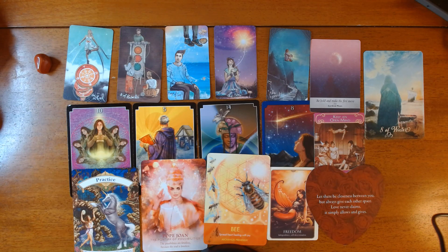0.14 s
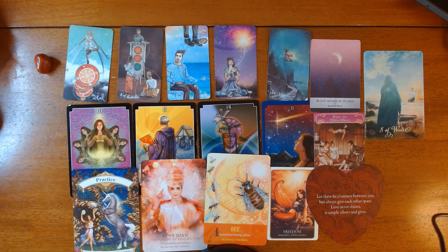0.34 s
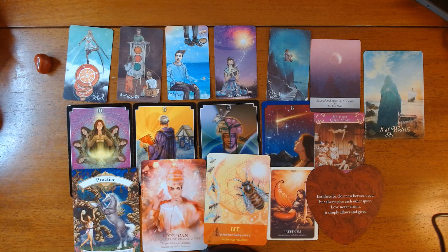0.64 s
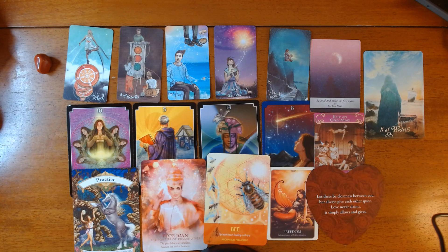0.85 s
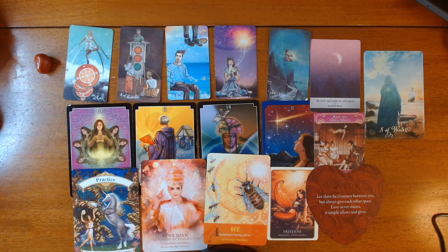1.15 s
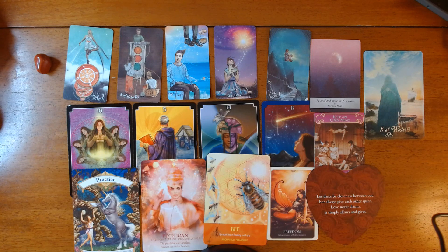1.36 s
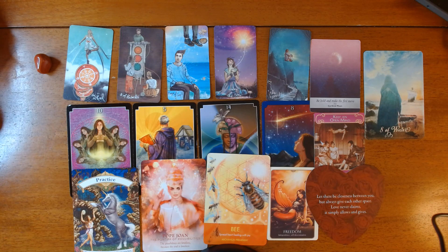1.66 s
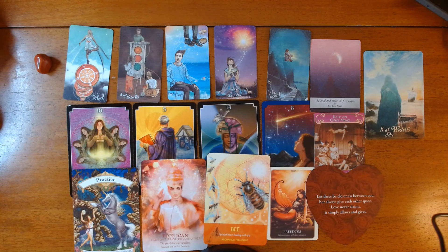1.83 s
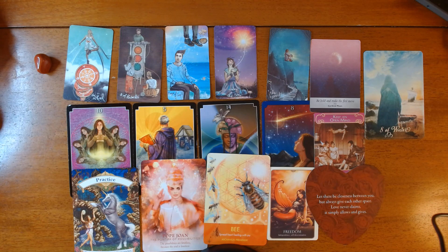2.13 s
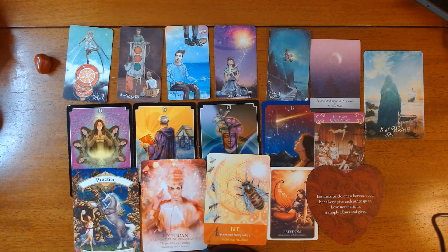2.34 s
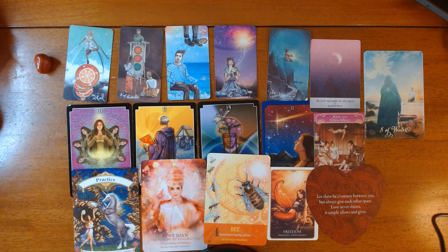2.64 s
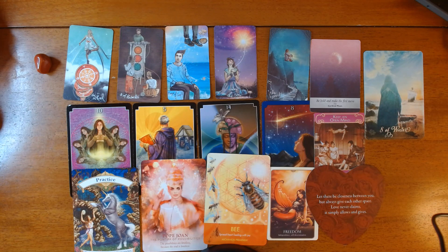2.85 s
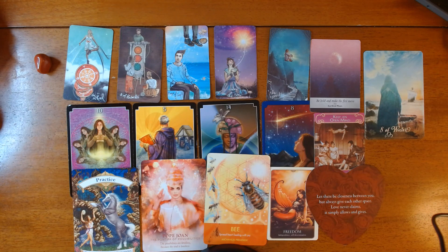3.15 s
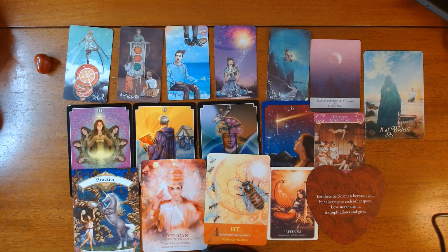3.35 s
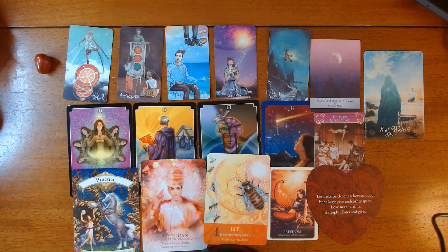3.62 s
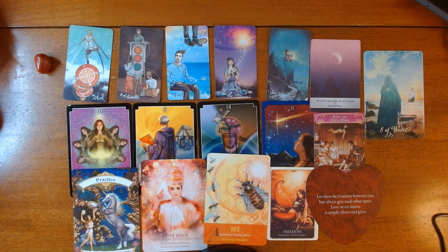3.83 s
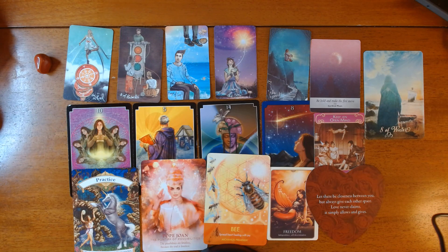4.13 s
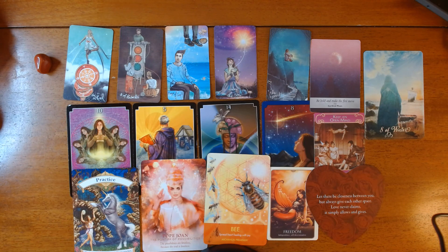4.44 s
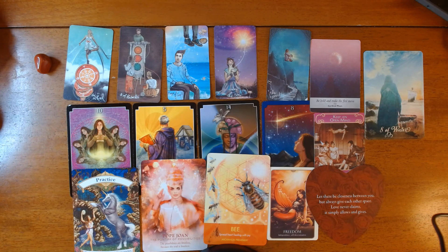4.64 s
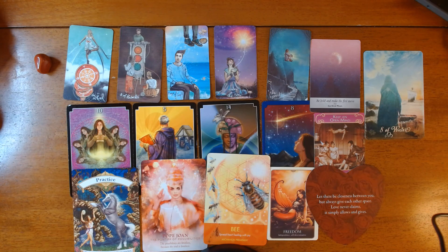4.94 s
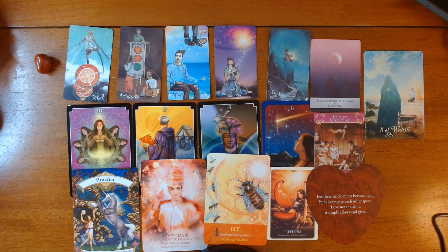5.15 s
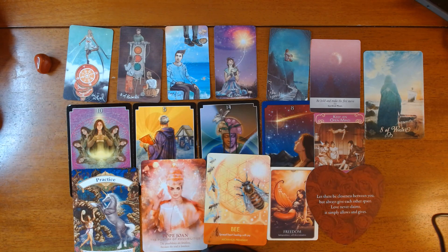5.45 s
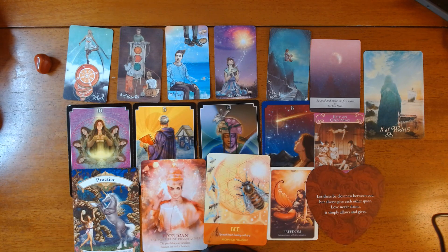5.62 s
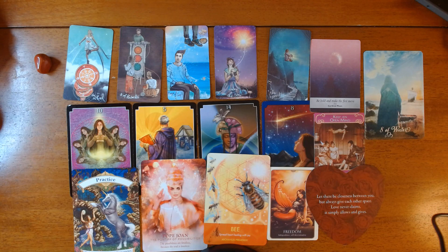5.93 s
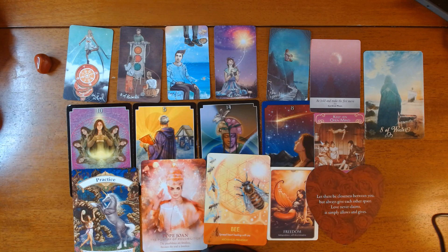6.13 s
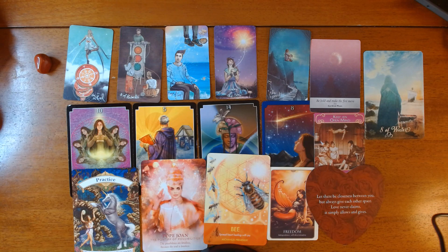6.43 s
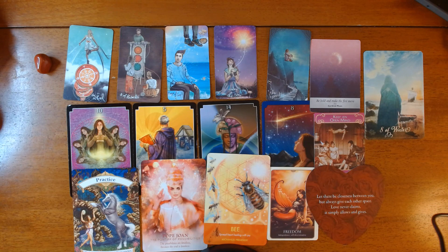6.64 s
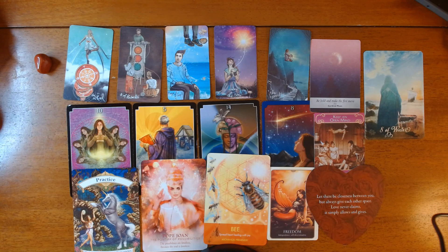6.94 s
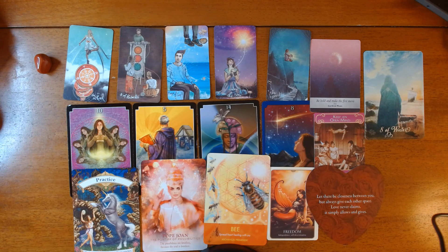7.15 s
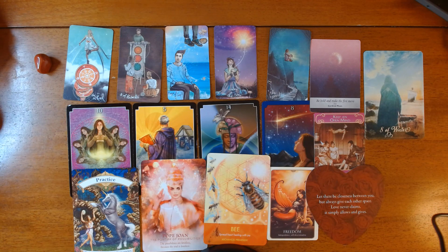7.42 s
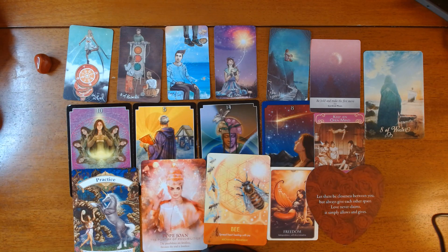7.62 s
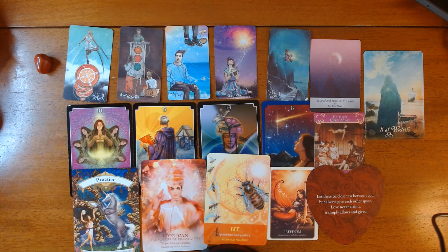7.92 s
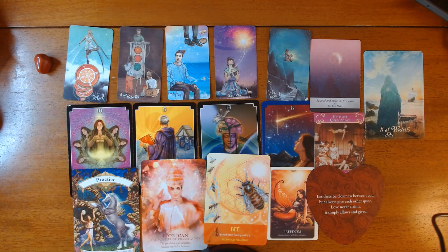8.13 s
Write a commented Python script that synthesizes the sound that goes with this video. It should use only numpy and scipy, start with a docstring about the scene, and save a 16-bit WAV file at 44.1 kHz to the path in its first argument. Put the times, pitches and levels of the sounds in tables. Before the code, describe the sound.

Fingers stir a heap of tiny metal charms with fine clinks, then a handful clatters onto a wooden table, followed by a bright jingle.

```python
"""A hand rummages in a heap of small metal charms, then spills a handful onto a card-covered wooden table.
They clatter, roll and ring; a few are nudged, one is tapped down, and a last bunch jingles brightly.
Metal is built from noisy cracks and short unrelated partials, wood from filtered bursts, drags from gliding noise.
The table booms and sways the microphone stand; a small room with a low hum answers."""
import sys
import numpy as np
from scipy import signal
from scipy.fft import rfft, irfft, next_fast_len
from scipy.io import wavfile
from scipy.ndimage import uniform_filter1d, map_coordinates

SR = 44100
rng = np.random.default_rng(int(sys.argv[2]) if len(sys.argv) > 2 else 0)


def int16_out(signal):
    """Quantize to a 16-bit WAV file."""
    q = np.round(np.clip(np.atleast_2d(signal).T, -1, 1) * 32767)
    wavfile.write(sys.argv[1], SR, q.astype(np.int16))


N = 365089
TIME = np.arange(N) / SR
TOP_HZ = 15850  # upper limit of partials and of the whole sound


def amp(db):
    """Decibels to gain."""
    return 10 ** (np.asarray(db) / 20)


def unit(x):
    """Scale to rms 1."""
    return x / np.sqrt(np.mean(x ** 2) + 1e-20)


def peak_unit(x, size):
    """Scale so that the loudest stretch of size samples has rms 1."""
    return x / np.sqrt(uniform_filter1d(x ** 2, size, mode="constant").max())


def along(points, hz):
    """Read (Hz, value) points on a log frequency axis."""
    point_hz, values = np.transpose(points)
    return np.interp(np.log(hz + 1), np.log(point_hz), values)


def gains(rows):
    """A gain per sample for each dB column, practically silent outside the rows."""
    s, *columns = np.transpose(rows)
    return [amp(np.interp(TIME, s, db, left=-120, right=-120)) for db in columns]


def swells(rows):
    """Gains for moves that swell 20 dB over their rise, die 20 dB over their fall, then come to rest."""
    settle_db = 23.5  # how firmly friction ends a move
    t = np.linspace(0, N / SR, N // 32)
    peak, rise, fall, *levels = np.transpose(rows)[:, :, None]
    away = np.maximum((peak - t) / rise, (t - peak) / fall)
    shape_db = -20 * away - settle_db * np.maximum(away - 1, 0) ** 2
    # overlapping moves add in power
    return [np.interp(TIME, t, np.linalg.norm(amp(db + shape_db), axis=0)) for db in levels]


def wobble(rate, size):
    """A smooth random curve, rate knots a second."""
    knots = rng.standard_normal(int(size * rate / SR) + 4)
    return map_coordinates(knots, [np.arange(size) * rate / SR])


def add(track, s, sound):
    """Mix a sound into a track at a time in seconds."""
    part = track[max(0, round(s * SR)):][:len(sound)]
    part += sound[:len(part)]


def filtered(x, response):
    """Apply a response given as a function of frequency."""
    size = next_fast_len(len(x) + 8192)
    return irfft(rfft(x, size) * response(np.fft.rfftfreq(size, 1 / SR)), size)[:len(x)]


def coloured(x, spectrum):
    """Give x a (Hz, dB) spectrum."""
    return filtered(x, lambda hz: amp(along(spectrum, hz)))


def resonances(hz, modes):
    """Complex response of (Hz, width Hz, dB) resonances."""
    return sum(amp(db) * 1j * hz * w / (c * c - hz * hz + 1j * hz * w) for c, w, db in modes)


def taps(rate, spread_db):
    """Random impulses of uneven strength, rate a second on average."""
    sizes = amp(spread_db * np.clip(rng.standard_normal(N), -2, 2)) * rng.choice([-1, 1], N)
    return sizes * (rng.random(N) < rate / SR)


def charm(t60, crack_t60, ring_db, count):
    """One small charm struck: a noise crack, then a few unrelated partials of its own."""
    t = np.arange(4096) / SR
    hz = rng.uniform(2600, TOP_HZ, (count, 1))
    life = t60 * np.exp(.5 * rng.standard_normal((count, 1)))
    strengths = rng.standard_normal((count, 1))
    ring = np.sum(strengths * amp(-60 * t / life) * np.sin(2 * np.pi * hz * t), axis=0)
    crack = rng.standard_normal(len(t)) * amp(-60 * t / crack_t60)
    return unit(crack) + amp(ring_db) * unit(ring)


def jostle(rate, spread_db, t60, crack_db):
    """Many contacts, each a crack and a few short partials that change with the way the charms touch."""
    blows = taps(rate, spread_db)
    at = np.flatnonzero(blows)
    k = np.arange(700)  # samples after a blow
    ring = np.zeros(N + len(k))
    for _ in range(3):
        hz = rng.uniform(2000, TOP_HZ, (len(at), 1))
        life = t60 * rng.uniform(.5, 1.5, hz.shape)
        grains = blows[at, None] * amp(-60 * k / SR / life) * np.sin(2 * np.pi * hz * k / SR)
        ring += np.bincount((at[:, None] + k).ravel(), grains.ravel(), len(ring))
    crack_envelope = signal.oaconvolve(abs(blows), amp(-60 * k / SR / 0.012))[:N]
    crack = crack_envelope * rng.standard_normal(N)
    return unit(ring[:N]) + amp(crack_db) * unit(crack)


# colour of the room air: pitch_hz, level_db (relative)
AIR_COLOUR = [(18, -5), (27, -6), (38, -15), (60, -10.5), (72, -8.5), (100, -19), (135, -21), (165, -30),
              (280, -33), (450, -38), (700, -39), (1150, -35.5), (1800, -48), (5000, -52), (16000, -54.5)]


def room_air():
    """Steady noise with its weight in the bass; its level is set by the part above 100 Hz."""
    noise = coloured(rng.standard_normal(N), AIR_COLOUR)
    return amp(-76.5) * noise / np.std(filtered(noise, lambda hz: hz > 100))


# steady low tones: pitch_hz, level_db
HUM_TONES = [(59.2, -63), (91.5, -75)]


def hum():
    """A low hum of steady sines."""
    return sum(amp(db) * np.sin(2 * np.pi * hz * TIME) for hz, db in HUM_TONES)


# soft brushes over the cards: peak_s, rise_s, fall_s, level_db
BRUSHES = [(6.19, .35, .1, -72), (6.555, 0.16, 0.052, -69)]
# colour of the brushing: pitch_hz, level_db (relative)
BRUSH_COLOUR = [(1500, -11.5), (4000, -7.5), (9000, -2.5), (16000, -5)]


def brushes():
    """Soft brushes over the cards: bright noise that swells and dies."""
    return swells(BRUSHES)[0] * unit(coloured(rng.standard_normal(N), BRUSH_COLOUR))


# decay of the room by pitch: pitch_hz, t60_s
ROOM_DECAY = [(200, 0.45), (1300, 0.34), (4000, 0.24), (9000, 0.27), (16000, 0.067)]


def room(x):
    """The walls answer after a short gap with a diffuse tail, duller than the direct sound."""
    hz, t, cells = signal.stft(rng.standard_normal(SR // 2), SR, nperseg=256)
    decay = amp(-60 * t / along(ROOM_DECAY, hz)[:, None])
    tail = signal.istft(cells * decay, SR, nperseg=256)[1]
    tail = np.pad(tail / np.linalg.norm(tail), (200, 0))
    wall_colour = [(300, -2), (1300, -7.0), (4000, -7.5), (9000, -13.0), (16000, -16.5)]
    return coloured(signal.oaconvolve(x, tail)[:N], wall_colour)


# the stand trembles: time_s, level_db
STAND_SWAY = [(0, -45.5), (.35, -54), (.6, -49), (.9, -49.5), (1.25, -58), (2.3, -73.5), (4.1, -50),
              (4.7, -69), (5.13, -43), (5.7, -61.5), (8.28, -75)]


def stand_tremble():
    """The swaying stand: noise gathered around 23 Hz that follows the sway level."""
    colour = [(10, -21.5), (23, 1.5), (32, -9), (60, -22.5), (150, -45), (400, -110)]
    return gains(STAND_SWAY)[0] * unit(coloured(rng.standard_normal(N), colour))


# weight on the table: start_s, boom_db, hardness_db
# (a soft push sways the stand, a hard blow brings out the drone)
THUMPS = [(0.448, -47, -19.5), (0.658, -38.5, -6.5), (3.34, -40, -2), (4.099, -41.5, -2),
          (4.189, -42.5, -3), (4.933, -30, -2), (5.047, -28, -3.5), (5.078, -33.5, 2), (5.36, -36.5, 6.5),
          (5.471, -36, 4.5), (5.559, -33.5, 4), (7.386, -48, 0), (7.97, -49.5, 10), (8.092, -44.5, 6),
          (8.128, -45.5, 14.5)]
# the table's boom, the stand's sway and the drone: pitch_hz, t60_s
TABLE_LOW = [(56.5, .45), (23, .85), (127, .5)]


def thumps():
    """The whole table booms and drones under a load, and the stand sways on it: three decaying sines."""
    sway_db, drone_db = -9, -12  # beside the boom, at zero hardness
    out = np.zeros(N)
    t = np.arange(SR) / SR
    onset = 1 - np.exp(-t / 0.0044)
    for s, boom_db, hard_db in THUMPS:
        for (hz, t60), db in zip(TABLE_LOW, (0, sway_db - hard_db, drone_db + hard_db)):
            swing = np.sin(2 * np.pi * hz * (1 + 0.0059 * rng.standard_normal()) * t)
            add(out, s, amp(boom_db + db - 60 * t / t60) * swing * onset)
    return out


# charms and fingers dragged a short way: start_s, length_s, first_hz, last_hz, width_hz, level_db
SCRAPES = [(0.116, 0.0886, 756, 1092, 295, -64), (.55, 0.052, 1597, 1760, 400, -60),
           (.6, 0.064, 700, 1232, 244, -63.5), (1.74, 0.1, 346.6, 679, 205, -61),
           (2.19, 0.098, 345.6, 515, 184, -59.5), (2.18, 0.14, 1912, 1592, 1023, -59),
           (3.325, 0.025, 172, 108, 91, -64), (3.56, 0.099, 660, 452, 200, -70.5),
           (3.7, 0.072, 188, 160, 71, -68), (3.8, 0.095, 165, 145, 52, -64.5),
           (4.07, 0.083, 159.6, 109, 80, -60), (5.2, 0.17, 14200, 15180, 3600, -57),
           (7.24, 0.0597, 598, 1096, 1097, -72.5), (7.388, 0.026, 12500, 12600, 6000, -56.5),
           (7.41, 0.18, 2233, 2600, 1200, -69.5)]


def scrapes():
    """A short drag swells and fades while its band of noise glides in pitch."""
    out = np.zeros(N)
    for s, length, first_hz, last_hz, width_hz, db in SCRAPES:
        size = int(length * SR)
        phase = 2 * np.pi * np.cumsum(np.linspace(first_hz, last_hz, size)) / SR
        band = wobble(width_hz, size) * np.cos(phase) + wobble(width_hz, size) * np.sin(phase)
        add(out, s, amp(db) * np.hanning(size) * unit(band))
    return out


# tiny charms that sound one clear note: start_s, pitch_hz, level_db, t60_s
TINKS = [(.04, 6630, -56, 0.076), (.182, 6710, -50, 0.044), (.254, 6570, -49.5, 0.048),
         (.583, 2940, -53, 0.047), (.662, 9500, -26, 0.029), (.712, 9380, -39.5, 0.047),
         (1.269, 11740, -34, 0.039), (1.688, 7540, -55, 0.26), (1.864, 5170, -46.5, 0.077),
         (1.962, 7670, -47, 0.061), (2.075, 7560, -52, 0.24), (2.6, 14640, -45, 0.13),
         (2.62, 4060, -64.5, 0.56), (2.645, 14640, -37.5, 0.13), (2.725, 8580, -39, 0.1),
         (2.726, 3970, -51.5, 0.36), (2.754, 10340, -49, 0.12), (3.314, 8400, -56, 0.11),
         (3.393, 8060, -62, .35), (3.459, 7900, -65, .37), (3.71, 8140, -51.5, 0.077),
         (3.707, 5890, -60, 0.16), (4.193, 6740, -47, 0.027), (5.044, 10400, -37, .023),
         (5.5, 9500, -32, 0.14), (5.552, 9480, -19.5, 0.043), (7.158, 5950, -66.5, 0.036),
         (7.401, 9540, -46.5, 0.064), (7.491, 10400, -48.5, .1), (7.71, 9300, -45.5, 0.056)]


def tinks():
    """A tiny charm comes free for a moment: a wavering note with two weak unrelated partials."""
    out = np.zeros(N)
    t = np.arange(SR // 3) / SR
    onset = 1 - np.exp(-t / 0.00075)
    for s, hz, db, t60 in TINKS:
        note = np.sin(2 * np.pi * hz * t + wobble(300, len(t)))
        others = np.sin(2 * np.pi * rng.uniform(5000, TOP_HZ, (2, 1)) * t).sum(axis=0)
        level_db = db - 60 * t / t60 + 3 * wobble(100, len(t))
        add(out, s, amp(level_db) * (note + amp(-16) * others) * onset)
    return out


# three larger charms ring freely, then are choked: start_s, free_s, first_db, second_db, third_db
RINGS = [(5.077, .028, -43, -46, -39), (5.098, 0.083, -41, -46, -30), (5.163, 0.033, -44, -40, -39),
         (5.465, 0.051, -45.5, -41.5, -54), (5.498, .03, -35, -37, -42), (5.526, 0.19, -37, -41, -48),
         (5.605, .05, -40.5, -43.5, -39), (8.12, 0.0033, -29, -23, -30), (8.127, .048, -29.5, -24, -39),
         (8.178, 0.005, -32, -24, -34), (8.188, 0.02, -28.5, -29.5, -36), (8.215, 0.032, -35, -32, -38),
         (8.251, .04, -46, -38, -46)]
# their partials, one list a charm: pitch_hz, level_db (relative), t60_s
RING_PARTIALS = [
    [(5680, -13, .3), (6185, -11, .25), (7521, 0, .5), (8868, -5, .4)],
    [(9776, 0, .35), (10291, -10, .25), (15626, -8, .3)],
    [(12795, -12, .25), (13232, -1, .25), (13598, 0, .25)],
]


def rings():
    """The larger charms sing, buzzing against their neighbours; each is choked after its own free time."""
    out = np.zeros(N)
    t = np.arange(SR // 6) / SR
    onset = 1 - np.exp(-t / .0004)
    for s, free, *strengths in RINGS:
        choke_db = -60 * np.maximum(t - free, 0) / 0.032
        for strength, partials in zip(strengths, RING_PARTIALS):
            for hz, db, t60 in partials:
                # every graze shifts the phase; the level shakes as well
                grazes = rng.standard_normal(len(t)) * (rng.random(len(t)) < 350 / SR)
                fray = np.cumsum(grazes) * 0.5
                shake_db = 2.8 * wobble(140, len(t)) + 1.5 * wobble(30, len(t))
                tone = np.sin(2 * np.pi * (hz * t + rng.random()) + fray)
                level_db = strength + db + shake_db - 60 * t / t60 + choke_db
                add(out, s, amp(level_db) * tone * onset)
    return out


# broad colour of a knock: pitch_hz, level_db (relative)
WOOD_COLOUR = [(80, -25.5), (250, -7.5), (450, -16), (800, -11), (1050, -3.5), (1400, -4), (1900, -5.5),
               (2600, -4), (3400, -7), (4400, -10.5), (7000, -20), (14000, -36)]
# clear resonances of the table top: pitch_hz, width_hz, level_db (relative)
TABLE_TOP = [(1172, 80, -2), (1296, 55, 6)]


def wood(x):
    """Blows on the table top: a broad knock with a few clear resonances."""
    return filtered(x, lambda hz: amp(along(WOOD_COLOUR, hz)) + resonances(hz, TABLE_TOP))


# loose charms rolling and skidding on the table: peak_s, rise_s, fall_s, wood_rattle_db, metal_db
FLURRIES = [(4.931, 0.0026, 0.057, -43.5, -46), (4.963, 0.0074, 0.13, -38, -46),
            (5.04, 0.023, 0.21, -39, -39), (5.08, 0.012, 0.089, -45, -34), (5.112, 0.046, .13, -41.5, -38),
            (5.172, 0.066, 0.095, -45.5, -39.5), (5.28, 0.093, 0.083, -56, -54),
            (5.365, 0.043, 0.098, -44, -72), (5.41, .04, .14, -46, -75), (5.467, 0.018, .11, -40.5, -45),
            (5.553, 0.035, 0.085, -42, -44.5), (5.635, .1, 0.046, -46.5, -45),
            (7.4, 0.019, 0.062, -61, -61.5), (7.49, 0.043, 0.063, -57.5, -62.5),
            (7.635, 0.062, 0.084, -77, -78), (7.686, 0.017, 0.034, -63.5, -66),
            (7.712, 0.005, 0.059, -61, -63.5), (8.1, .04, .03, -60, -72),
            (8.122, 0.0076, 0.056, -47.5, -46), (8.22, 0.088, 0.88, -57.5, -50)]
# colour of metal clicks, here and in the single contacts: pitch_hz, level_db (relative)
CLICK_COLOUR = [(900, -21.5), (2000, -11), (3500, -7), (5500, -6), (7500, 0.5), (9600, -1.5), (11500, -6.5),
                (13500, -3), (16000, -8)]


def tumble():
    """Loose charms chatter on the wood and against each other in dense random taps."""
    rattle, metal = swells(FLURRIES)
    on_wood = unit(wood(taps(rate=520, spread_db=3)))
    jostling = jostle(rate=500, spread_db=2, t60=.032, crack_db=-2.5)
    on_metal = unit(coloured(jostling, CLICK_COLOUR))
    return rattle * on_wood + metal * on_metal


# the clearest single contacts: start_s, metal_click_db, wood_knock_db
CONTACTS = [(0.461, -59.5, -80), (.663, -40.5, -57), (.689, -41.5, -70), (.714, -39.5, -46.5),
            (0.892, -52.5, -63), (.973, -60, -57), (1.164, -56, -66), (1.246, -40.5, -67),
            (1.272, -42, -67), (1.474, -61, -61), (1.857, -44, -59), (2.356, -54, -56), (2.541, -46, -53.5),
            (2.726, -42, -72), (2.977, -54.5, -62), (2.986, -55, -62), (3.048, -42.5, -54),
            (3.106, -47.5, -74), (3.315, -59, -82), (3.347, -50.5, -72), (3.394, -46.5, -60),
            (3.452, -53, -63), (3.518, -48.5, -59.5), (3.851, -57, -78), (4.179, -69, -52),
            (4.385, -74, -66.5), (4.783, -67, -75.5), (4.876, -56, -71), (4.893, -47, -69),
            (4.91, -50.5, -68), (4.922, -41.5, -68.5), (4.931, -42, -32.5), (4.962, -24, -28),
            (4.989, -33.5, -25), (5.003, -35, -38), (5.037, -32.5, -34), (5.043, -35.5, -29),
            (5.076, -18.5, -28), (5.112, -28, -40), (5.117, -31, -29.5), (5.149, -33, -38),
            (5.169, -32.5, -33), (5.184, -32, -44.5), (5.215, -41, -40.5), (5.316, -49.5, -59.5),
            (5.335, -47.5, -54.5), (5.361, -49, -38), (5.403, -47, -41.5), (5.416, -44, -38),
            (5.458, -40, -42.5), (5.468, -35.5, -32), (5.524, -34.5, -35.5), (5.552, -24.5, -32.5),
            (5.577, -29.5, -46), (5.608, -46, -40), (7.159, -79, -67), (7.279, -77, -72),
            (7.386, -55, -77.5), (7.403, -51.5, -67), (7.467, -70, -58), (7.49, -48.5, -71),
            (7.56, -57.5, -72), (7.684, -53.5, -67), (7.711, -48.5, -46.5), (7.772, -63.5, -57),
            (7.967, -47, -33), (7.977, -58.5, -46), (8.129, -28, -39), (8.167, -47, -58),
            (8.179, -33.5, -44), (8.214, -41, -47)]


def contacts():
    """A contact cracks in the metal and knocks what lies under it; heavy charms click lower; each hops once."""
    tilt_db, heavy_dulls_db = -3, 0.05  # click slope per octave; its drop per dB of knock over click
    bounce_s, bounce_loss_db = .006, 14  # mean delay of the hop and its drop in level
    lead = 32  # samples of room before the attack, for the filters to spread into
    out = np.zeros(N)
    t = np.arange(4096) / SR
    for s, click_db, knock_db in CONTACTS:
        slope_db = np.clip(tilt_db - heavy_dulls_db * (knock_db - click_db), -8, 1.5)
        colour = [(hz, db + slope_db * np.log2(hz)) for hz, db in CLICK_COLOUR]
        hop_s = bounce_s * (.5 + rng.random())
        for delay, loss_db in ((0, 0), (hop_s, bounce_loss_db)):
            struck = charm(t60=.022, crack_t60=.011, ring_db=0, count=10)
            click = coloured(np.pad(struck, (lead, 0)), colour)
            burst = rng.standard_normal(len(t)) * amp(-60 * t / 0.014)
            knock = wood(np.pad(burst, (lead, 0)))
            both = amp(click_db) * peak_unit(click, size=44) + amp(knock_db) * peak_unit(knock, size=88)
            add(out, s + delay - lead / SR, amp(-loss_db) * both)
    return out


# strokes of the fingers through the heap: peak_s, rise_s, fall_s, clinking_db, rubbing_db
STIRS = [(.16, 0.45, 0.22, -64.5, -62.5), (.62, 0.14, 0.12, -70, -57.5), (.666, 0.031, 0.1, -45, -52),
         (.895, 0.034, .12, -62, -60), (1.0, 0.14, 0.21, -62.5, -65.5), (1.14, 0.027, 0.14, -57, -58),
         (1.25, .035, 0.11, -49.5, -53.5), (1.3, 0.061, 0.14, -46.5, -59.5),
         (1.475, 0.19, 0.19, -50.5, -54.5), (1.62, 0.11, 0.18, -53.5, -61.5),
         (1.695, 0.046, 0.031, -48, -58), (1.87, 0.17, 0.14, -47.5, -57), (2.08, .1, 0.063, -48.5, -56),
         (2.12, 0.071, 0.036, -48.5, -66), (2.25, 0.14, 0.21, -57, -59), (2.545, 0.17, 0.13, -51.5, -61),
         (2.63, 0.084, 0.16, -53, -64.5), (2.729, 0.0064, 0.14, -48.5, -58.5),
         (2.86, 0.048, 0.1, -57.5, -64), (3.04, .005, 0.095, -46.5, -58),
         (3.087, 0.056, 0.082, -49.5, -72.5), (3.23, .08, 0.074, -68, -89), (3.316, 0.0035, 0.22, -57, -78),
         (3.4, 0.057, 0.12, -63, -75), (3.71, 0.028, 0.046, -60, -72.5), (3.85, 0.074, 0.051, -62.5, -80),
         (4.07, 0.12, 0.21, -64.5, -66.5), (4.19, 0.18, 0.042, -76.5, -74)]
# the hand never lies quite still in the heap: time_s, clinking_db, rubbing_db
RESTLESS_HAND = [(0, -84, -67), (.5, -75, -71), (.85, -77, -74.5), (1.4, -85, -73), (2.9, -67.5, -76),
                 (3.6, -75, -75), (4.2, -85, -76.5), (4.5, -96, -89), (4.9, -89.5, -84.5)]
# resonances shared by the charms in the heap: pitch_hz, width_hz, level_db (relative)
HEAP_MODES = [(2800, 14, -43), (3036, 230, -6.5), (4220, 130, -5.5), (5050, 27, -15), (5940, 33, -5.5),
              (6970, 54, -2), (8610, 37, 3.5), (9960, 200, -1), (10070, 40, -2.5), (10400, 31, -3.5),
              (11800, 1100, -3.5), (13300, 230, -3.5), (13400, 98, -9.5), (14510, 67, -1.5),
              (15600, 170, -9)]
# colour of the damped clinks: pitch_hz, level_db (relative)
HEAP_COLOUR = [(900, -33), (1800, -2.5), (3000, -10), (3700, -8.5), (4200, -6), (6200, -5), (8500, 3),
               (10000, 1), (12000, -5.5), (14500, -9.5), (15700, -2)]
# colour of the rubbing skin: pitch_hz, level_db (relative)
RUB_COLOUR = [(100, -22), (220, -6.5), (340, 0.5), (600, -2.5), (850, -7), (1220, 3.5), (1600, -7),
              (2400, -12.5), (5000, -17), (12000, -38.5)]


def rummage():
    """Fingers stir the heap stroke by stroke: a fine shimmer of sliding metal, damped clinks and a low rub."""
    # charms catch and slip within a stroke, and so does the rubbing skin
    uneven_db = 1.5 * wobble(90, N)
    lumpy_db = 1.66 * wobble(45, N)
    clink, rub = np.hypot(swells(STIRS), gains(RESTLESS_HAND)) * amp([uneven_db, lumpy_db])
    sliding = taps(rate=900, spread_db=5)
    shimmer = unit(filtered(sliding, lambda hz: resonances(hz, HEAP_MODES)))
    jostling = jostle(rate=700, spread_db=5.5, t60=0.07, crack_db=0.5)
    clinks = unit(coloured(jostling, HEAP_COLOUR))
    metal = unit(amp(-2.0) * shimmer + clinks)
    rubbing = unit(coloured(taps(rate=900, spread_db=5), RUB_COLOUR))
    return clink * metal + rub * rubbing


def scene():
    """Charms answered by the room, over the table's lows and the background."""
    charms = rummage() + scrapes() + tinks() + tumble() + contacts() + rings()
    table = thumps() + stand_tremble()
    background = room_air() + hum() + brushes()
    return (charms + room(charms) + table + background)[None]


def record(dry):
    """A steep low-pass, 200 Hz wide, centred on the upper limit."""
    return np.array([filtered(x, lambda hz: np.clip((TOP_HZ - hz) / 200 + .5, 0, 1)) for x in dry])


dry = scene()
out = record(dry)
int16_out(out)
```